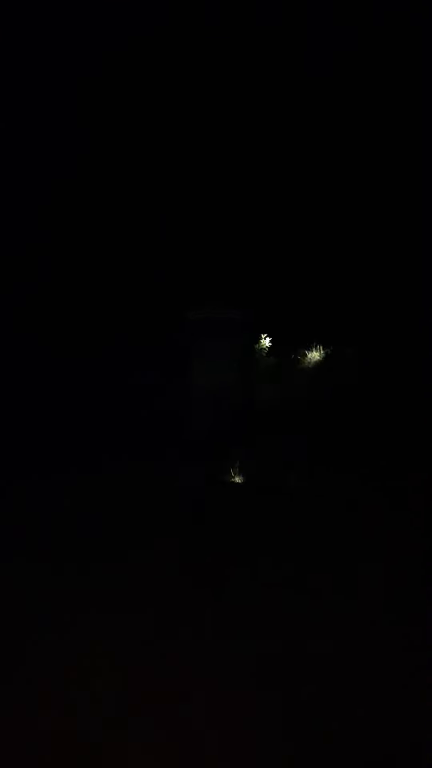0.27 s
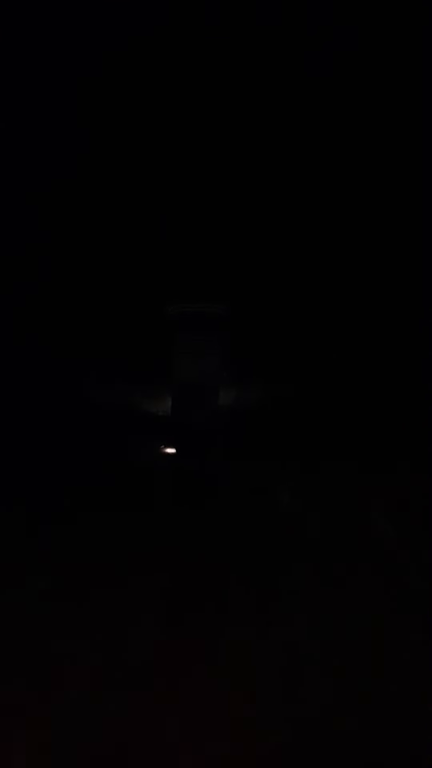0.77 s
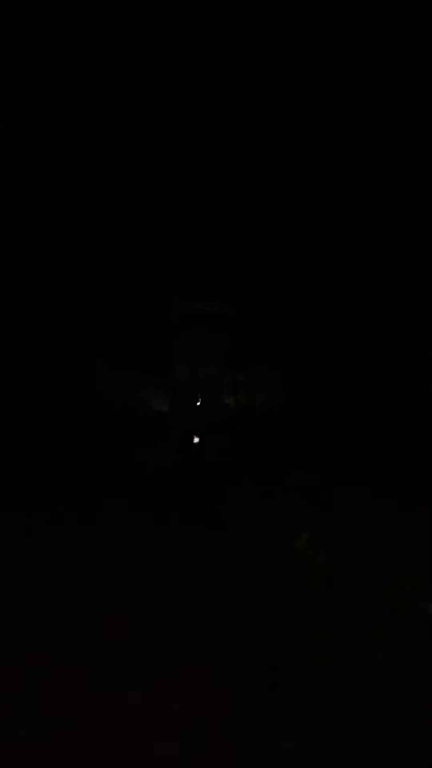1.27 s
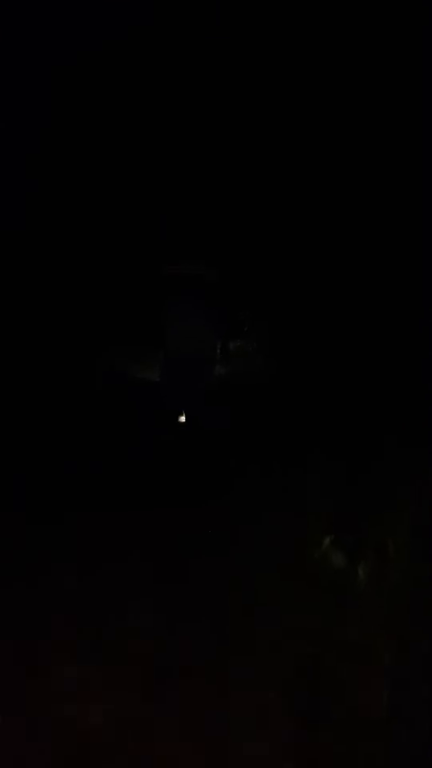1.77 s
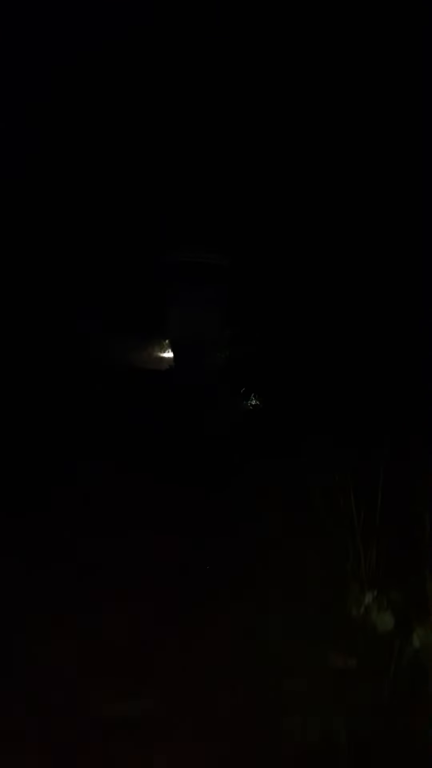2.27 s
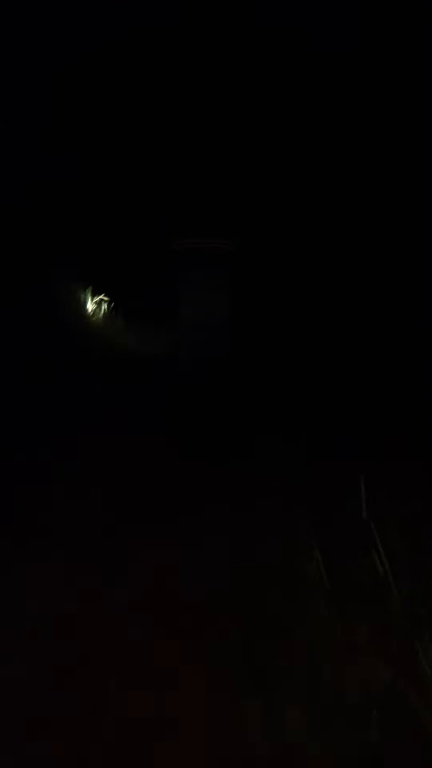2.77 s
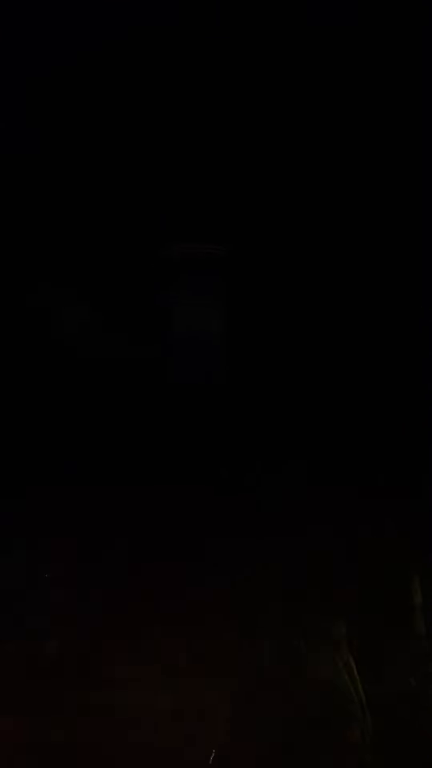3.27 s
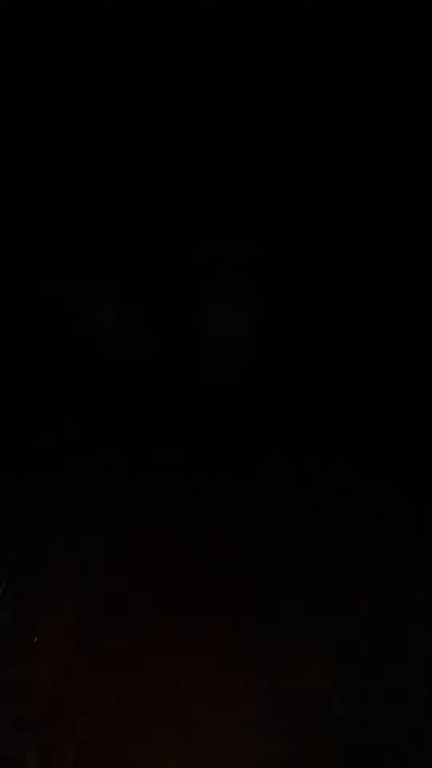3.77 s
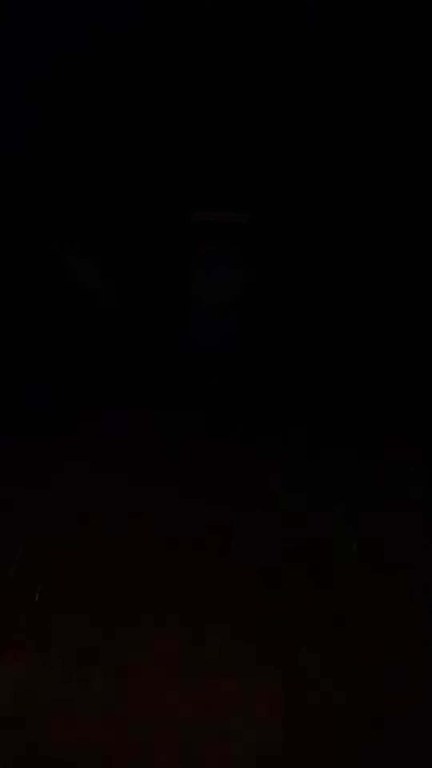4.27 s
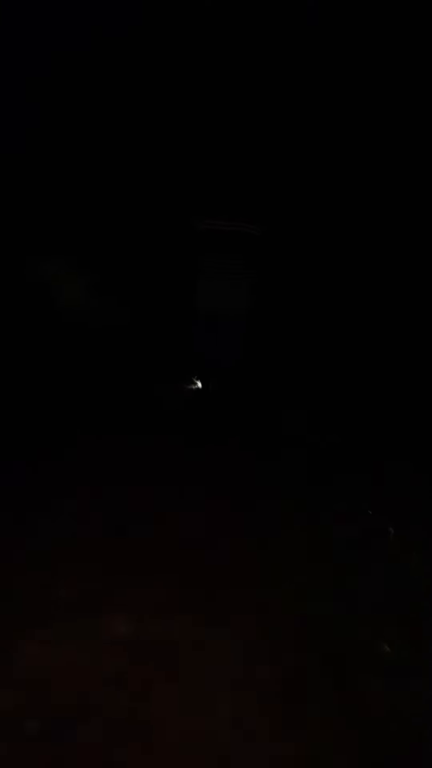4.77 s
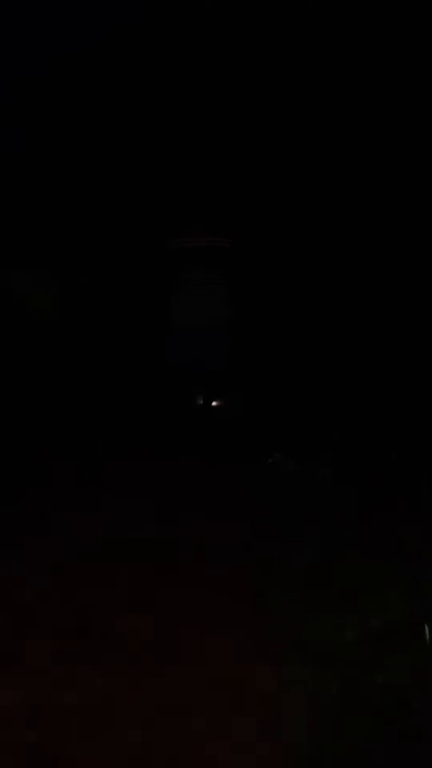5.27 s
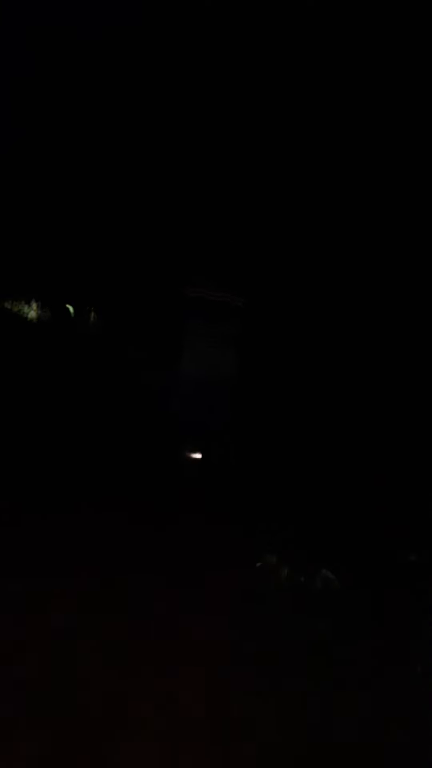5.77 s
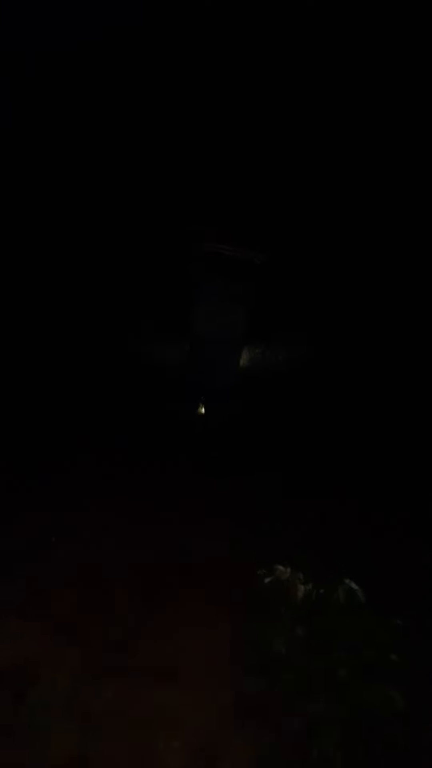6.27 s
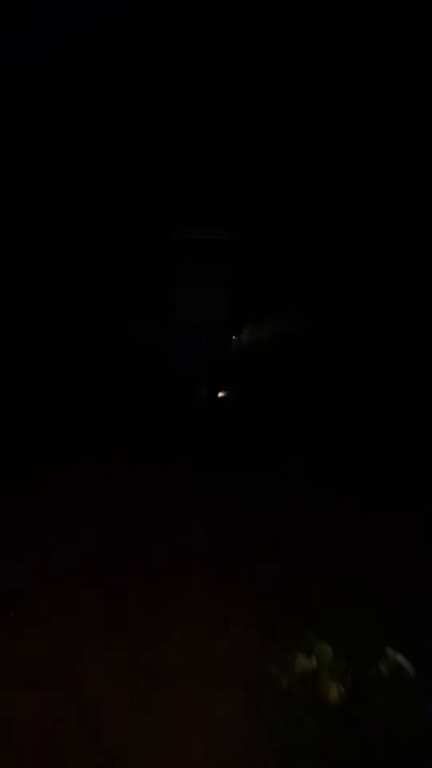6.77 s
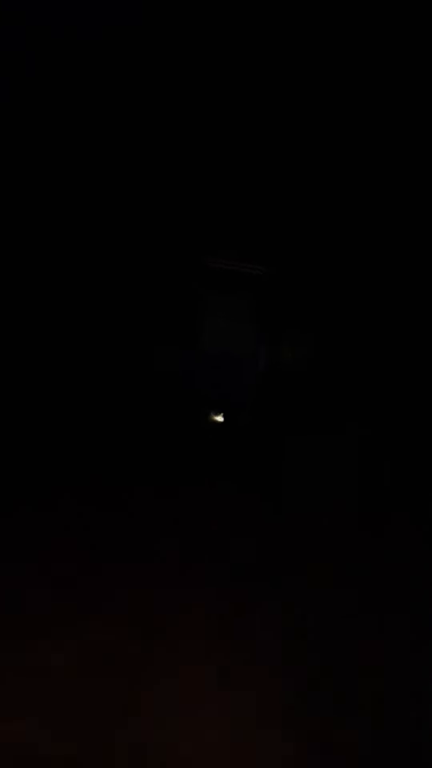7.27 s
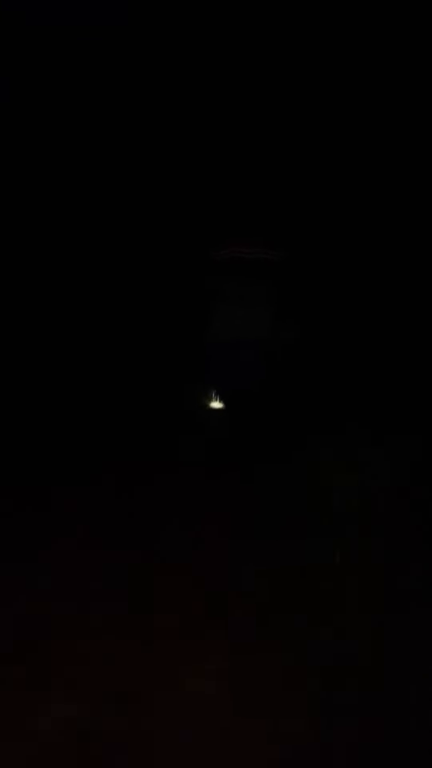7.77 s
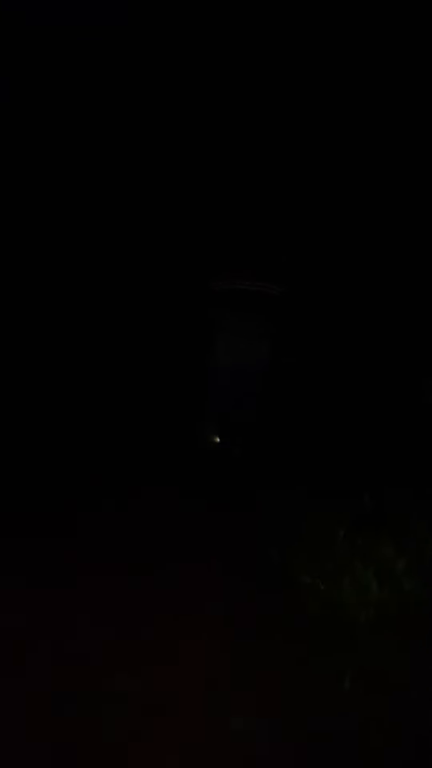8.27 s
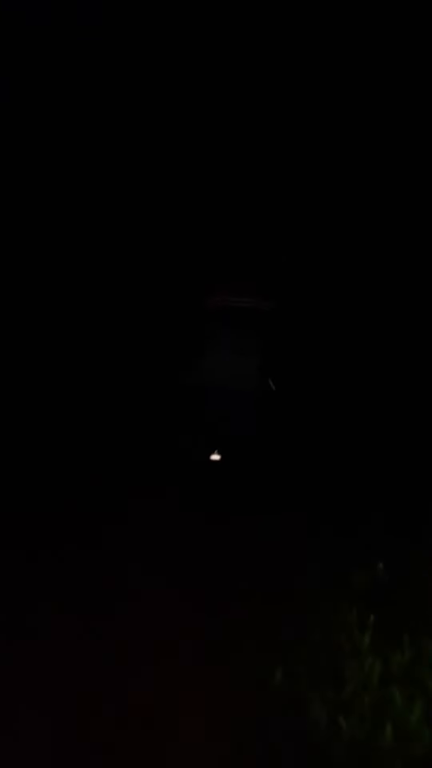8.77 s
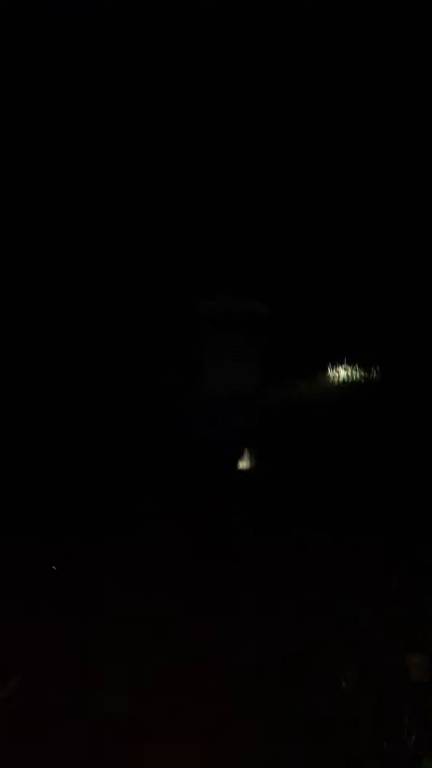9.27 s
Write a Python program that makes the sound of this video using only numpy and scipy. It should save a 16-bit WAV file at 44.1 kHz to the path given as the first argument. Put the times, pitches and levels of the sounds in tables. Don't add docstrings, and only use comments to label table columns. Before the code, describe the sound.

Three insects trade rapid, high buzzing trills at close range on a night bush track, over distant insect hiss, swishing grass and soft footsteps.

```python
import sys
import numpy as np
from scipy import signal
from scipy.fft import rfft, irfft, next_fast_len
from scipy.io import wavfile
from scipy.ndimage import uniform_filter1d

SR = 44100
rng = np.random.default_rng(int(sys.argv[2]) if len(sys.argv) > 2 else 0)


def generate_wav(signal):
    frames = np.transpose(np.atleast_2d(signal))
    scaled = np.clip(frames, -1, 1) * 32767
    pcm = np.round(scaled).astype(np.int16)
    wavfile.write(sys.argv[1], SR, pcm)


def to_linear_factor(level_db):
    exponent = np.asarray(level_db, float) / 20
    return 10 ** exponent


N = 420261
T = np.arange(N) / SR


def unit(x):
    return x / np.sqrt(np.mean(x ** 2))


def colour(x, gain):
    n = next_fast_len(N)
    hz = np.arange(n // 2 + 1) * SR / n + 1e-3
    return irfft(rfft(x, n) * gain(hz), n)[..., :N]


def on_log(table, hz):
    points = np.array(table)
    return np.interp(np.log(hz), np.log(points[:, 0]), points[:, 1])


def walk(rate):
    k = int(SR / rate)
    held = np.repeat(rng.standard_normal(N // k + 1), k)
    return 1.28 * uniform_filter1d(uniform_filter1d(held, k), k)[:N]


def pan(x, db):
    return x * to_linear_factor(np.array([[db / 2], [-db / 2]]))


def add(out, x, s):
    i = int(round(s * SR))
    a, b = max(i, 0), min(i + x.shape[-1], N)
    if b > a:
        out[..., a:b] += x[..., a - i:b - i]


def leaves(t60=.11, sparse_db=2.5):
    t = np.arange(12000) / SR
    echo = rng.standard_normal((2, 12000)) * to_linear_factor(sparse_db * rng.exponential(1, (2, 12000)))
    fade = to_linear_factor(-60 * t / t60) + .7 * np.exp(-t / .006)
    echo = echo * fade * np.clip(t / .0015, 0, 1)
    return echo / np.sqrt(np.sum(echo ** 2, axis=1, keepdims=True))


def scatter(sent):
    share = np.array([walk(2.5) for _ in range(3)])
    share = share / np.sqrt(np.sum(share ** 2, axis=0))
    return sum(signal.oaconvolve(sent * part, leaves(), axes=1)[:, :N] for part in share)


# (t/s, half tone level/dB, third level/dB)
FACING = [(0, 2.5, 8), (1.5, 0, 4), (3, 0, 18), (4.501, 3, 16), (5.9, 3.5, 16), (6.3, 4, -3),
          (7.5, -2.5, -3), (9.53, 6, -3)]


def singer(calls, voice, course):
    top_hz, half_db, third_db, left_db = voice
    climb, scoop, scoop_s, slow, lag_ms, rise_ms, leaves_db, attack = course
    tone, under = np.zeros(N + SR), np.zeros(N + SR)
    n = np.arange(400)
    u = n / SR * 500 / rise_ms
    shape = (u * np.exp(1 - u)) ** 4
    scrape = colour(rng.standard_normal(N), lambda f: 1 / (1 + ((f - top_hz) / 2200 * 2) ** 4))
    rasp = np.tile(to_linear_factor(-24) * unit(scrape), 2)
    when, half_gain_db, third_gain_db = np.transpose(FACING)
    for s, length, rate_hz, early_db, late_db in calls:
        chance = rng.standard_normal((40, 4))
        k = np.arange(int(round(length * rate_hz)) + 1)
        k_chance = chance[k]
        since = (k + slow * 8 * (1 - np.exp(-k / 8))) / rate_hz
        rise = 1 - climb * (1 - since / length) - scoop * np.exp(-since / scoop_s)
        hz = top_hz * rise * (1 + .012 * k_chance[:, 0])
        swell_db = np.interp(since / length, [.25, .8], [early_db, late_db]) + 1.2 * k_chance[:, 1]
        swell_db = swell_db - 12 * np.exp(-k / attack) - 10 * np.exp((k - k[-1]) / 2.5)
        size = to_linear_factor(swell_db)[:, None] * shape
        turn = 2 * np.pi * (hz[:, None] * n / SR / 2 + k_chance[:, 2:3])
        start_s = s + since + (.1 * k_chance[:, 3] - 2 * rise_ms) / 1000
        at = (start_s * SR).astype(int)[:, None] + n
        third_amp = to_linear_factor(third_db + np.interp(s, when, third_gain_db)) * 1.34
        half_amp = to_linear_factor(half_db + np.interp(s, when, half_gain_db) + 4)
        np.add.at(tone, at, size * (np.sin(2 * turn) + rasp[at] + third_amp * shape * np.sin(3 * turn)))
        np.add.at(under, at, size * half_amp * shape ** 1.1 * np.sin(turn))
    tone = tone[:N] * to_linear_factor(1.2 * walk(22))
    under = under[:N] * to_linear_factor(1.2 * walk(16))
    left = np.interp(T - lag_ms / 1000, T, to_linear_factor(left_db) * tone + to_linear_factor(-5) * under)
    sent = np.array([to_linear_factor(-10) * tone + to_linear_factor(-7) * under, tone + to_linear_factor(-8) * under])
    wet = scatter(sent)
    hidden_db = np.interp(T, [1.6, 4.2], [.8, 3.5])
    direct = np.array([left, tone + under])
    return to_linear_factor(-hidden_db / 2) * direct + to_linear_factor(leaves_db + hidden_db / 2) * wet


# (first burst t/s, length/s, burst rate f/Hz, early peak level/dB, late peak level/dB)
HIGH_CALLS = [(-0.1726, 0.26, 103.6, -32, -16.5), (0.2932, 0.26, 104, -20.5, -16),
              (0.7624, 0.29, 103.4, -19, -20.5), (1.2256, 0.26, 103.2, -16.5, -14.5),
              (1.7404, 0.27, 103.1, -20.5, -19), (2.224, 0.28, 102.2, -21, -20),
              (2.7252, 0.27, 103, -20.5, -27), (3.1944, 0.26, 103.7, -26, -23.5),
              (3.6708, 0.29, 103.3, -23.5, -26), (4.137, 0.26, 102.5, -23.5, -26),
              (4.6054, 0.26, 102.4, -21.5, -22), (5.1416, 0.26, 102.9, -23.5, -19.5),
              (5.6292, 0.25, 102.2, -25, -20)]
# (top pitch f/Hz, half tone level/dB, third level/dB, left level/dB)
HIGH_VOICE = (7547, -11.5, -46.5, -60.5)
# (slow climb/top, opening scoop/top, scoop t/s, slowness of first bursts,
# left lag/ms, burst rise/ms, leaves level/dB, attack/bursts)
HIGH_COURSE = (.085, .09, .035, .02, .125, .47, -7.5, 1.0)


def high_singer():
    return singer(HIGH_CALLS, HIGH_VOICE, HIGH_COURSE)


# (start t/s, length/s, level/dB)
JOINS = [(0.023, 0.041, -60), (0.22, 0.33, -56), (0.726, 0.15, -60), (0.943, 0.036, -55),
         (1.17, 0.042, -57), (1.258, 0.11, -62), (1.567, 0.053, -55), (2.29, 0.036, -63),
         (2.868, 0.046, -55.5), (5.06, 0.04, -58), (5.361, 0.024, -59), (5.782, 0.064, -62),
         (8.265, 0.038, -56)]


def joins():
    power = 1
    for s, length, db in JOINS:
        inside_s = np.minimum(T - s, s + length - T)
        fade = np.clip(inside_s / .025 + 1, 0, 1)
        power = power + to_linear_factor(2 * (db + 63.5)) * fade ** 2
    return 10 * np.log10(power) - 2.5


# (f/Hz, width f/Hz, level/dB, chirp rate f/Hz, chirp length/ms, left minus right level/dB)
CHORUS = [(2137, 380, -63, 330, 11, -9.5), (4786, 720, -60, 510, 3.2, -6), (9870, 1300, -74, 450, 3, -7),
          (6777, 1800, -65, 870, 4.2, -26.5), (526, 168, -68, 65, 25, 1.5)]
# (f/Hz, likeness 0-1)
ALIKE = [(30, 0), (130, 0.56), (300, 0.73), (700, 0.59), (1400, 0.3), (3000, 0.16)]


def chorus():
    out = 0
    for k, (hz, width_hz, db, rate, chirp_ms, pan_db) in enumerate(CHORUS):
        starts = (rng.random((2, N)) < rate / SR) * to_linear_factor(rng.exponential(1, (2, N)))
        gate = uniform_filter1d(starts, max(int(chirp_ms * SR / 1000), 1), axis=1)
        hiss = rng.standard_normal((2, N)) * (np.sqrt(np.abs(gate) / gate.mean()) + .5)
        band = colour(hiss, lambda f: 1 / (1 + ((f - hz) / (width_hz / 2)) ** 4))
        band[0] += 2.6 * max(on_log(ALIKE, hz), 0) * band[1]
        drift_db = joins() if k == 0 else .5 * walk(2.5)
        level = to_linear_factor(db + drift_db + 1.3 * walk(10))
        out = out + pan(np.array([unit(v) for v in band]) * level, pan_db)
    return out


# (f/Hz, level/dB per Hz)
AIR = [(15, -11), (25, -43), (53, -7), (545, -5), (863, -8.5), (2110, -3), (2690, -7), (4740, -5.5),
       (5570, -15), (6740, -3.5), (9070, -25.5), (10100, -23.5), (16000, -29)]


def air():
    def likeness(f):
        return np.clip(on_log(ALIKE, f), -.99, .99)

    mid, side = rng.standard_normal((2, N))
    mid = colour(mid, lambda f: to_linear_factor(on_log(AIR, f)) * np.sqrt(1 + likeness(f)))
    side = colour(side, lambda f: to_linear_factor(on_log(AIR, f)) * np.sqrt(1 - likeness(f)))
    both = unit(np.array([mid + side, mid - side])) * to_linear_factor(-54)
    low = colour(both, lambda f: 1 / (1 + (f / 350) ** 4))
    return low * to_linear_factor(1.1 * walk(11)) + pan((both - low) * to_linear_factor(0.22 * walk(3.7)), -1.6)


# (f/Hz, level/dB)
GRASS = [(500, -30), (3000, -12), (7500, -12), (9000, -17), (11000, -7), (15500, 0)]
# (middle t/s, level/dB, half length/s)
SWISH = [(.37, -62, .1), (.88, -57, .015), (1.0, -63, .08), (1.55, -59, 0.1), (1.73, -62, .04),
         (1.908, -65, .06), (2.094, -58, 0.037), (2.65, -60, .04), (2.845, -53, .014), (3.05, -62, .06),
         (3.214, -53, .018), (3.394, -63, .04), (3.71, -60, .04), (3.84, -56, 0.022), (4.3, -60, 0.11),
         (4.4, -58, 0.017), (4.67, -64, 0.067), (5.04, -60, 0.091), (5.307, -60, .06), (5.64, -61, .06),
         (5.785, -62, 0.044), (6.0, -61, 0.018), (6.09, -54, .015), (6.4, -66, 0.03), (6.68, -59, 0.043),
         (7.25, -57, 0.031), (7.85, -56, 0.033), (8.503, -65, 0.19), (9.16, -62, .05), (9.47, -61, .06)]


def swish():
    grains = rng.standard_normal((2, N)) * to_linear_factor(1.9 * rng.exponential(1, N))
    bright = colour(grains, lambda f: to_linear_factor(on_log(GRASS, f)))
    power = to_linear_factor(2 * (-64.5 + 1.1 * walk(30.5)))
    for s, db, half in SWISH:
        power = power + to_linear_factor(2 * db) * np.exp(-((T - s) / half) ** 2)
    return pan(unit(bright) * np.sqrt(power), -5.0)


LOW_CALLS = [(0.0638, 0.18, 99.5, -22.5, -24), (0.522, 0.19, 100.0, -20.5, -22.5),
             (0.9586, 0.18, 100.0, -20.5, -22.5), (1.487, 0.19, 99.2, -23, -20),
             (1.9646, 0.17, 99.5, -20.5, -20.5), (2.467, 0.19, 98.0, -19.5, -20),
             (2.9396, 0.2, 99.0, -17.5, -23.5), (3.409, 0.18, 99.5, -18.5, -21.5),
             (3.8832, 0.17, 100.2, -18, -21.5), (4.3536, 0.18, 100.0, -21, -22),
             (4.858, 0.2, 99.2, -19.5, -21), (5.3708, 0.19, 100.8, -22.5, -26),
             (5.8082, 0.21, 100.0, -23.5, -24), (6.319, 0.23, 99.5, -26, -25), (6.79, 0.27, 99.5, -27, -27),
             (7.3044, 0.28, 99.8, -23, -28), (7.8228, 0.33, 100.0, -26.5, -31),
             (8.3804, 0.33, 100.0, -28, -29), (8.9818, 0.36, 99.8, -29, -39)]
LOW_VOICE = (6960, -14.5, -56.5, -15)
LOW_COURSE = (.115, .085, .012, .05, .12, .6, -3, 2.6)


def low_singer():
    return singer(LOW_CALLS, LOW_VOICE, LOW_COURSE)


# (t/s, level/dB, left minus right level/dB)
TICKS = [(0.234, -46.5, 4), (1.385, -45, 6), (2.601, -50, 4), (5.115, -54, 7), (6.023, -55.5, 4),
         (6.33, -52.5, 6), (6.452, -57, -1.5), (6.994, -60, -0.5), (7.524, -49, 8), (8.745, -61, 25)]
# (f/Hz, time to fall 60 dB t/s, level/dB)
CLIP_MODES = [(783, 0.028, 8), (1410, 0.018, 11), (2100, 0.038, 2.5), (1050, .015, -4)]


def ticks():
    out, u = np.zeros((2, N)), np.arange(4000) / SR
    for s, db, pan_db in TICKS:
        ring = 0
        for (hz, t60, mode_db), c in zip(CLIP_MODES, rng.standard_normal((4, 2))):
            fall = to_linear_factor(mode_db + 3.1 * c[0] - 60 * u / t60)
            ring = ring + fall * np.sin(2 * np.pi * hz * (1 + 0.034 * c[1]) * u)
        add(out, pan(to_linear_factor(db - 5.0) * ring, pan_db), s)
        add(out, pan(to_linear_factor(db - 20.0) * ring, pan_db), s + 0.00526)
    return out


# (t/s, f/Hz, level/dB)
HUM = [
    (.24, 178, -100),
    (.32, 178, -75),
    (.55, 185, -77),
    (.62, 185, -100),
    (3.44, 175, -100),
    (3.52, 175, -73),
    (3.85, 174, -74),
    (4.1, 175, -75),
    (4.25, 175, -100),
]


def hum():
    s, hz, db = np.transpose(HUM)
    turn = np.pi * np.cumsum(np.interp(T, s, hz) * (1 + 0.0042 * walk(7.7))) / SR
    orders = np.sin(2 * turn) + to_linear_factor(-17) * np.sin(turn)
    orders = orders + to_linear_factor(-5) * np.sin(3 * turn) + to_linear_factor(-6) * np.sin(4 * turn)
    return orders * to_linear_factor(np.interp(T, s, db) + 9 + 0.56 * walk(11.0))


SHORT_CALLS = [(0.2895, 0.14, 101, -14.5, -14), (0.7698, 0.086, 102.8, -17, -42),
               (1.2296, 0.16, 100.8, -13, -23), (1.7582, 0.11, 109, -24, -41),
               (2.2746, 0.17, 100.3, -17.5, -28), (2.764, 0.29, 102.8, -36, -19),
               (3.1976, 0.16, 103.3, -18.5, -24.5), (3.6742, 0.13, 103, -20, -21.5),
               (4.1474, 0.28, 101.7, -23.5, -40), (4.663, 0.13, 101.0, -21.5, -24),
               (5.1696, 0.13, 103.7, -23, -26), (5.6694, 0.17, 103.2, -22, -28),
               (6.1348, 0.13, 104.7, -29.5, -32), (6.5946, 0.15, 102, -27.5, -29.5),
               (7.0962, 0.16, 102.5, -29, -29), (7.6222, 0.16, 101.4, -36, -32.5),
               (8.1762, 0.17, 102.5, -34.5, -30.5), (8.7796, 0.18, 100.5, -35, -37),
               (9.3592, 0.16, 101.4, -35.5, -36)]
SHORT_VOICE = (7068, -14, -51, -9)
SHORT_COURSE = (.08, .085, .015, .05, .12, .62, -4, 1.4)


def short_singer():
    return singer(SHORT_CALLS, SHORT_VOICE, SHORT_COURSE)


# (t/s, level/dB, thump f/Hz, left minus right level/dB, fade t/s)
STEPS = [(0.409, -62, 191, -11, 0.019), (0.548, -59, 190, -1.0, 0.016), (0.651, -59.5, 286, -1, 0.026),
         (0.706, -58, 207, -0.5, 0.01), (1.141, -57, 252, -1.0, 0.017), (1.659, -58, 318, -1.5, 0.016),
         (2.294, -56, 195, -3, 0.016), (2.861, -62, 113, -21, 0.02), (3.319, -61, 305, -6, 0.012),
         (5.106, -57, 298, 1.0, 0.024), (5.281, -57.5, 109, -9, 0.02), (5.634, -66, 61.9, 10, 0.017),
         (5.808, -51.5, 176, 2, 0.021), (6.289, -63, 125, -15, 0.018), (7.182, -58, 264, 3, 0.011),
         (7.336, -62, 135, -12, 0.021), (7.515, -58.5, 191, -3.0, 0.014), (8.181, -60, 211, -2.5, 0.032),
         (8.702, -66, 219, -4, 0.021), (8.979, -60, 418, 2.0, 0.011), (9.312, -56, 162, -3, 0.026)]


def steps():
    out, u = np.zeros((2, N)), np.arange(6000) / SR
    soil_band = signal.butter(1, [70, 450], "band", fs=SR)
    for s, db, hz, pan_db, fade in STEPS:
        soil = signal.lfilter(*soil_band, rng.standard_normal(6000))
        shape = np.clip(u / 0.0012, 0, 1) * np.exp(-u / max(fade, .003))
        thump = np.sin(2 * np.pi * hz * u)
        add(out, pan(to_linear_factor(db + 2.0) * shape * (thump + 6.6 * soil), pan_db), s)
    return out


def scene():
    insects = high_singer() + low_singer() + short_singer() + chorus()
    walker = swish() + ticks() + steps()
    return insects + air() + walker + hum()


def roll_off(x):
    return signal.sosfilt(signal.butter(12, 15770, fs=SR, output="sos"), x)


def record(dry):
    closed = colour(dry, lambda f: f < 15770)
    return roll_off(closed - .0006)


dry = scene()
out = record(dry)
generate_wav(out)
```